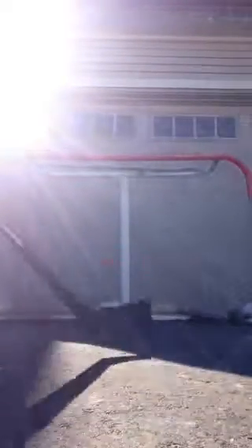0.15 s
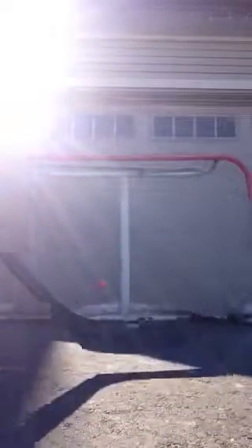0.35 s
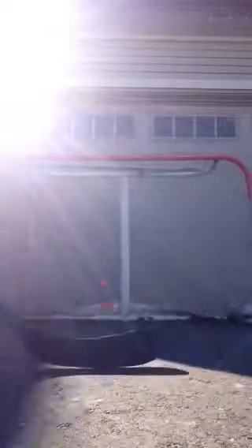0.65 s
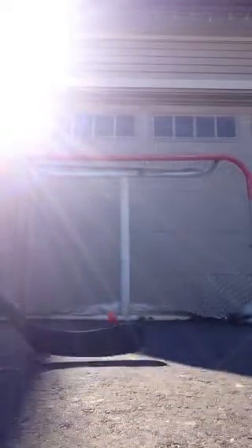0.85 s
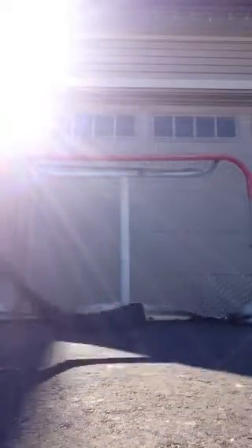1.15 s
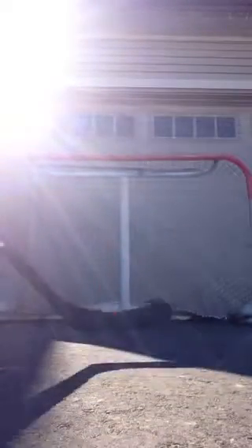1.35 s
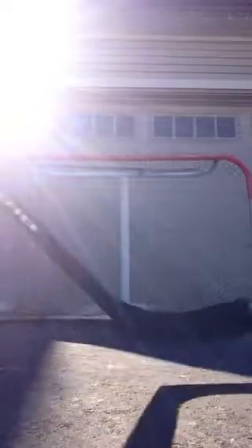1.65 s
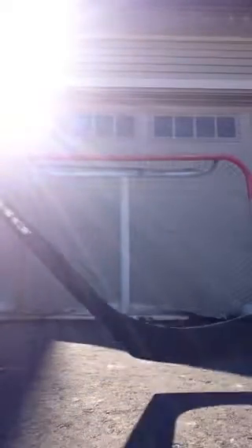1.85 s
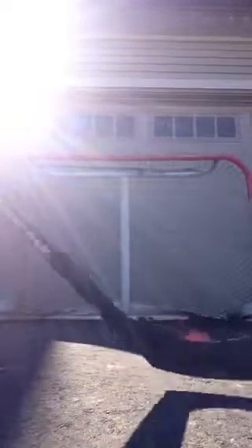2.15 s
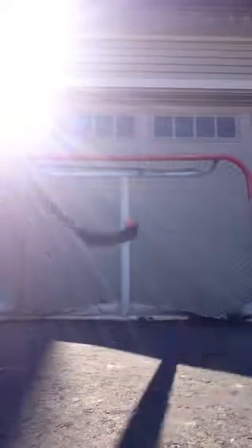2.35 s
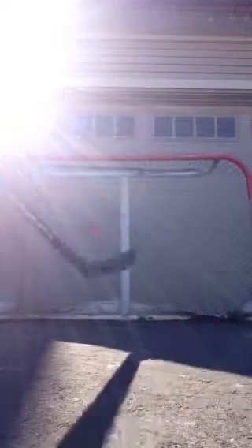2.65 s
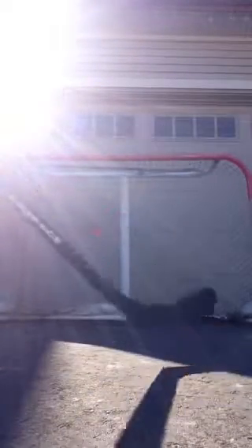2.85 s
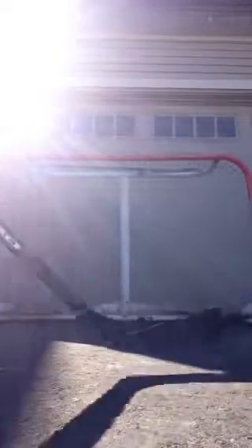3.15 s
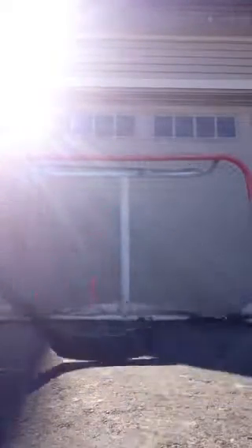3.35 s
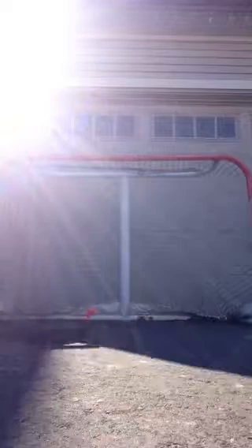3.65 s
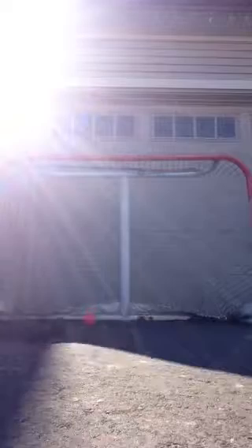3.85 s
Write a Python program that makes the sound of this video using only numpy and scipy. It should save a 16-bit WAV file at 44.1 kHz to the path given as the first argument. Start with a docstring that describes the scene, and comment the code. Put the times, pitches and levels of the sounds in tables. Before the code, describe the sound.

A hockey stick taps and scrapes lightly on gritty pavement, cracks a ball hard into a net, then clatters and drags; close microphone outdoors by a garage, short echoes, early wind puffs, faint traffic.

```python
"""Taps and scrapes of a hockey blade on a paved driveway, one hard shot at a ball, then a clatter and drag.
Place: open paving before a garage front, which returns each knock as short echoes and a scattered tail.
Each knock is a coloured click with a crunch of grit and ringing blade modes; strokes are streams of grains.
Microphone: shaped noise makes wind puffs on it, over a steady far wash of traffic.
The recorder's gain, low at the start, ducks after the shot and creeps back; loud peaks are clipped."""
import sys
import numpy as np
from scipy import signal
from scipy.fft import rfft, irfft
from scipy.io import wavfile
from scipy.ndimage import uniform_filter1d, minimum_filter1d

SR = 44100
rng = np.random.default_rng(int(sys.argv[2]) if len(sys.argv) > 2 else 0)


def generate_wav(signal):
    """Clip the signal to [-1, 1] and save it as 16-bit WAV at the path in sys.argv[1]."""
    frames = np.transpose(np.atleast_2d(signal))
    scaled = np.clip(frames, -1, 1) * 32767
    pcm = np.round(scaled).astype(np.int16)
    wavfile.write(sys.argv[1], SR, pcm)


N = 176400  # 4 s

# Knocks of blade and ball, with some close echoes and grit crunches: start_s, then thud, knock, clack, snap
# and tick level_db, blade_ring_db (before the trim), lower and upper resonance pitch_hz, their height_db, crunch_s
KNOCKS = [ (0.4744, -42.5, -18.5, -23, -31.5, -38.5, -5.5, 1380, 4760, 9.6, 0.00072),
          (0.4855, -55, -36, -41, -32.5, -47, -14, 1930, 3750, 9, 0.0077),
          (0.5654, -28.5, -21, -16, -23, -64, -5, 2070, 3130, 4.9, 0.0061),
          (0.6372, -37, -31.5, -44, -55, -72, 8, 900, 4610, 5.1, 0.0011),
          (0.8255, -31, -31, -35, -30.5, -44.5, -18, 790, 2620, 4.4, 0.01),
          (1.0388, -46, -39, -38, -40, -48.5, -1, 1040, 4560, 3.1, 0.0013),
          (1.4136, -22, -25, -44, -48, -83, -9, 500, 970, 4.5, 0.0037),
          (2.2825, -12, -5, -11.5, -14, -35, -6.5, 647, 1310, 7.4, 0.00089),
          (2.283, -19.5, -13.5, -6, -8.5, -23.5, -7.5, 1430, 5500, 6.3, 0.0049),
          (2.3020, -31, -16, -21, -46, -47, -9, 800, 1346, 5, 0.0012),
          (2.3103, -31, -17.5, -16.5, -33, -35, -9, 900, 1500, 4.4, 0.00072),
          (2.3117, -47, -29, -23, -21, -30.5, -10, 1850, 4400, 8.2, 0.0023),
          (3.1195, -43.5, -19, -23, -22.5, -33, -12, 1450, 4730, 3.9, 0.0023),
          (3.4017, -23.5, -13.5, -17.5, -31.5, -47, 6.5, 1060, 2530, 3.7, 0.00085),
          (3.4077, -52, -19.5, -19.5, -37, -47, -7, 1060, 2550, 4.9, 0.0011),
          (3.4989, -46, -21.5, -20.5, -18.5, -27.5, -12, 2730, 4580, 14, 0.0044),
          (3.5566, -42, -27, -21.5, -18, -24.5, -3, 2260, 5500, 5.4, 0.0056),
          (3.5719, -35, -22.5, -23, -32, -46, -5, 930, 1700, 7.8, 0.0015),
          (3.5722, -42, -32, -37, -17, -36, -12, 3580, 4400, 19, 0.0047),
          (3.7245, -30, -28.5, -35, -54, -51, -10, 794, 1600, 5, 0.00061),
          (3.736, -24, -24, -30, -48, -63, -10, 1050, 1610, 6, 0.0006)]
# Light ticks of grit under blade and ball: start_s, level_db, brightness_db_per_octave, pitch_hz
TICKS = [(0.087, -37.5, 4.5, 3900), (0.777, -36, -5, 1100), (0.8361, -27, 0, 790),
         (1.1589, -35.5, 0.5, 2560), (1.234, -41.5, 3, 4830), (2.6485, -32.5, -1, 3500),
         (2.883, -32, -3, 2120), (3.447, -25.5, 1, 1510), (3.4583, -26, 0.5, 1490), (3.473, -27, -1, 4700),
         (3.511, -31.5, -5.5, 890), (3.523, -35, -3, 4500), (3.5308, -24.5, -1.5, 3850),
         (3.583, -28, 0, 2470), (3.5995, -25.5, -1.5, 1360), (3.607, -29, -3.5, 1290),
         (3.6328, -20.5, 0, 2030), (3.656, -25, -1.5, 1100), (3.692, -22.5, -2, 5500),
         (3.726, -31.5, 5, 5400), (3.7641, -22.5, 1.5, 5450), (3.812, -34.5, 4.5, 5400),
         (3.8542, -26.5, 2.5, 4820)]
# Usual colour of a tick, one level_db for each colour band
TICK_COLOUR_DB = [-18.5, -9, -9, -12, -20.5]
TICK_SPREAD_DB = 2  # no two grains have the same colour
TICK_RING_DB, TICK_CRUNCH_S, TICK_PEAK_DB = -0.5, 0.0026, 8.5
# A tick's upper pitch over its lower: least_ratio, greatest_ratio
TICK_OVERTONE = (1.3, 2.62)
# Air shoved by the shot: start_s, peak_db (before smoothing), decay_s
SHOT_PUSH = (2.2823, -26, 0.0038)


def knocks():
    """Blade and ball knock, with some close echoes and crunches; grit ticks; the shot shoves the air."""
    out = np.zeros(N)
    for start_s, *bands_db, ring_db, low_hz, high_hz, peak_db, crunch_s in KNOCKS:
        add(out, start_s, yard(knock(bands_db, ring_db, (low_hz, high_hz), peak_db, crunch_s)))

    octaves = np.log2(np.array(COLOUR_HZ) / COLOUR_HZ[2])
    for start_s, level_db, tilt, hz in TICKS:
        bands_db = level_db + np.array(TICK_COLOUR_DB) + tilt * octaves
        bands_db = bands_db + TICK_SPREAD_DB * rng.standard_normal(len(octaves))
        pitches_hz = (hz, hz * rng.uniform(*TICK_OVERTONE))
        add(out, start_s, yard(knock(bands_db, TICK_RING_DB, pitches_hz, TICK_PEAK_DB, TICK_CRUNCH_S)))

    start_s, peak_db, decay_s = SHOT_PUSH
    u = np.arange(SR // 15) / SR / decay_s
    push = (1 - u) * np.exp(-u)  # out, then back
    add(out, start_s, amp(peak_db) * signal.lfilter([.1], [1, -.9], push))
    return out


# Centres of the thud, knock, clack, snap and tick bands: centre_hz
COLOUR_HZ = [280, 900, 2100, 4200, 9000]
PEAK_WIDTH_HZ, PEAK_WIDTH_SHARE = 216, 0.069  # the resonances widen with pitch
KNOCK_SPAN_S = 0.008  # span over which a knock's level holds; also the reference crunch


def knock(bands_db, ring_db, pitches_hz, peak_db, crunch_s):
    """One knock or tick: band levels set its colour, its place two short, broad resonances."""
    band_widths_hz = np.array([400, 1000, 1500, 3000, 6000])
    db = np.array(bands_db) - 10 * np.log10(band_widths_hz)
    below = [(40, db[0] - 29), (130, db[0] - 13.0)]
    above = [(12500, db[-1] - 12.5), (16000, db[-1] - 14)]
    peaks = [(hz, peak_db, PEAK_WIDTH_HZ + PEAK_WIDTH_SHARE * hz) for hz in pitches_hz]
    pulse = click([*below, *zip(COLOUR_HZ, db), *above], peaks)
    struck = signal.fftconvolve(crunch(crunch_s), pulse)
    energy = KNOCK_SPAN_S * SR * np.sum(amp(bands_db) ** 2)
    return unit(blade(struck, ring_db, pitches_hz)) * np.sqrt(energy)


CRUNCH_DB = 17.5  # grit against the first tick, for a crunch of 8 ms


def crunch(crunch_s):
    """A first tick and a swell of crushed grit, spread evenly over all frequencies."""
    u = np.minimum(np.arange(SR // 80) / SR / max(crunch_s, 1 / SR), 1)
    swell = unit(rng.standard_normal(len(u)) * u * (1 - u))
    force = swell * amp(CRUNCH_DB) * crunch_s / KNOCK_SPAN_S
    force[0] = 1
    spectrum = rfft(force, 2048)
    smooth_power = uniform_filter1d(abs(spectrum) ** 2, size=25)
    return irfft(spectrum / np.sqrt(smooth_power))[:len(u)]


# Modes of the blade: pitch_hz, level_db (relative), t60_s
BLADE = [(567, -7, 0.056), (1093, -7, 0.036), (1659, -5.5, 0.043), (2196, -1, 0.041), (2540, 1.5, 0.078),
         (3556, 6.5, 0.037), (4330, 3.5, 0.048), (4660, 12.5, 0.016), (5654, 11, 0.013),
         (12850, 10.5, 0.031)]
MODE_SPREAD_DB, MODE_DETUNE = 0.5, 0.011  # each ring differs a little; detune is a share
FOCUS_DB_PER_OCTAVE = 4  # the point of contact favours some modes
RING_TRIM_DB = -7.0  # added to every blade ring level


def blade(x, ring_db, favoured_hz):
    """The direct sound plus the ringing of the blade, strongest near the favoured pitches."""
    t = np.arange(SR // 8) / SR
    ring = np.zeros(len(t))
    for hz, level_db, t60_s in BLADE:
        louder, sharper = rng.uniform(-1, 1, 2)
        octaves_away = min(np.min(abs(np.log2(hz / np.array(favoured_hz)))), 1)
        size = amp(level_db + MODE_SPREAD_DB * louder - FOCUS_DB_PER_OCTAVE * octaves_away)
        decay = np.exp(-np.log(1000) * t / t60_s)
        ring += size * decay * np.cos(2 * np.pi * hz * (1 + MODE_DETUNE * sharper) * t)
    ring = unit(ring) * amp(ring_db + RING_TRIM_DB)
    ring[0] += 1
    return signal.fftconvolve(x, ring)


# Strokes of the blade edge, singing: start_s, length_s, level_db (before the edge cut)
SLIDES = [(.64, 0.07, -39), (.70, 0.069, -35), (.778, 0.017, -28), (3.41, 0.06, -41), (3.565, 0.091, -38)]
# Flat drags of blade and ball, dull: start_s, length_s, level_db, brightness_db_per_octave
SCUFFS = [(1.422, 0.0204, -42, 0.79), (1.63, 0.082, -30.5, 1.56), (3.653, 0.066, -31, 0),
          (3.734, 0.1767, -29, 0.3), (3.911, 0.11, -32.5, 0.73)]
# Loose grit: start_s, length_s, level_db
BRUSHES = [(.09, 0.06, -43), (.28, 0.041, -44.5), (.84, 0.26, -53.5), (1.6, 0.14, -56), (2.05, 0.157, -50),
           (2.66, 0.12, -47), (3.58, 0.42, -57)]
# Coarse grit under the dragged blade: start_s, length_s, level_db
GRAVEL = [(3.42, 0.048, -40), (3.58, .06, -38.5), (3.66, 0.267, -44)]
# The ball sinks into the net: start_s, length_s, level_db
NET_RUSTLE = [(2.315, 0.029, -31), (2.345, 0.1, -47.5)]
# Spectra of edge, flat drag and loose grit: frequency_hz, level_db_per_hz (relative)
SLIDE_SPECTRUM = [(100, -17), (500, 5.5), (1500, 4.5), (3200, -3), (4400, -1.5), (5800, -17), (7000, -29),
                  (15000, -55)]
SCUFF_SPECTRUM = [(60, -45), (150, -5.5), (280, 8), (600, 1), (1700, -8.5), (3000, -23.5), (5000, -24.5),
                  (15000, -59.5)]
BRUSH_SPECTRUM = [(200, -12), (1500, 10.5), (4500, 6.5), (6500, 0), (10000, -10.5), (15000, -26)]
SLIDE_RING_DB, USUAL_RING_HZ, EDGE_CUT_DB = -6, 3600, -5.5  # ring level is before the trim


def scrapes():
    """The edge rings in the blade's modes; flat drags are dull; loose grit and the net hiss."""
    edge = friction(SLIDES, grains_per_s=2500, spread_db=2.5)
    edge = blade(edge, SLIDE_RING_DB, [USUAL_RING_HZ])[:N]
    out = colour(edge, SLIDE_SPECTRUM) * amp(EDGE_CUT_DB)

    for *stroke, tilt in SCUFFS:
        spectrum = [(hz, db + tilt * np.log2(hz)) for hz, db in SCUFF_SPECTRUM]
        out += colour(friction([stroke], grains_per_s=5000, spread_db=0.5), spectrum)

    net = friction(NET_RUSTLE, grains_per_s=650, spread_db=1.0)
    gravel = friction(GRAVEL, grains_per_s=260, spread_db=2.0)
    loose_grit = friction(BRUSHES, grains_per_s=1500, spread_db=1.5)
    return out + colour(net + gravel + loose_grit, BRUSH_SPECTRUM)


# Resonances of the dragged edge: pitch_hz, pole_width_hz, level_db (against the slips)
SQUEAL = [(4390, 710, -9.5), (5540, 330, -15.5)]
SQUEAL_WANDER, WANDER_S = 0.01, 0.02  # pitch wander: share, step
CHATTER_DB, CHATTER_S = 3.5, 0.006  # level chatter: spread, step


def squeal():
    """The dragged edge chatters and sings at pitches that wander with the point of contact."""
    slips = friction(SLIDES, grains_per_s=2500, spread_db=2.0) * amp(CHATTER_DB * drift(CHATTER_S))
    bend = 1 + SQUEAL_WANDER * drift(WANDER_S)
    out = np.zeros(N)
    for hz, width_hz, level_db in SQUEAL:
        turn = np.exp(2j * np.pi * np.cumsum(hz * bend) / SR)
        r = np.exp(-np.pi * width_hz / SR)
        # Shift the moving pitch to zero, resonate there, shift back
        ring = turn * signal.lfilter([1], [1, -2 * r, r * r], slips / turn + 1e-18)
        out += amp(level_db) * unit(ring.real) * np.linalg.norm(slips)
    return out


STROKE_RISE_S, STROKE_FALL_S = 0.01, 0.0078


def friction(strokes, grains_per_s, spread_db):
    """Grains of uneven size, caught while a stroke lasts."""
    t = np.arange(N) / SR
    hits = rng.random(N) < grains_per_s / SR
    sizes = amp(spread_db * np.minimum(rng.exponential(1, N), 4))
    grains = hits * rng.choice([-1, 1], N) * sizes
    press = np.zeros(N)
    for start_s, length_s, level_db in strokes:
        rise = np.clip((t - start_s) / STROKE_RISE_S + .5, 0, 1)
        fall = np.clip((start_s + length_s - t) / STROKE_FALL_S + .5, 0, 1)
        press += amp(level_db) * rise * fall
    return unit(grains) * np.sqrt(N) * press


def drift(step_s):
    """Slow chance: a new value every step, joined by lines."""
    values = rng.standard_normal(N // 40)
    return np.interp(np.arange(N) / SR / step_s, np.arange(len(values)), values)


# Echoes off ground and walls: delay_s, level_db (at low frequencies)
ECHOES = [(.0063, -17.5), (0.0156, -29.5), (0.0211, -19.5), (.0288, -28)]
YARD_DB, YARD_T60_S, YARD_RISE_S = -5, 0.15, 0.0023  # scattered tail: energy against the direct sound


def yard(x):
    """The direct sound, a few distinct, duller echoes and a short scattered tail."""
    t = np.arange(SR // 3) / SR
    swell = 1 - np.exp(-(t / YARD_RISE_S) ** 2)
    scatter = rng.standard_normal(len(t)) * swell * np.exp(-np.log(1000) * t / YARD_T60_S)
    spectrum = [(100, -11.0), (400, -11.5), (1200, -4.5), (4000, -4.5), (12000, 4)]
    response = amp(YARD_DB) * unit(colour(scatter, spectrum))
    response[0] += 1
    dull_click = signal.lfilter([.5], [1, -.5], signal.unit_impulse(SR // 1000))
    for delay_s, level_db in ECHOES:
        add(response, delay_s, amp(level_db) * dull_click)
    return signal.fftconvolve(x, response)[:N]


# Wind puffs on the microphone: centre_s, level_db (at the centre, before the high-pass), half_width_s
PUFFS = [(.005, -26.5, 0.0051), (0.128, -33.5, 0.031), (.295, -26, 0.017), (0.341, -28, 0.0079),
         (0.357, -16.5, 0.0078), (0.391, -26, 0.015), (0.524, -28.5, 0.014), (1.13, -43, 0.032)]
# Spectrum of the air before its swells are evened: frequency_hz, level_db_per_hz (relative)
PUFF_SPECTRUM = [(30, -37), (70, 2), (115, -15.5), (215, 1.5), (320, -12), (500, -12), (800, -29),
                 (3000, -82)]


def wind():
    """Short low puffs on the microphone: shaped noise under bell-shaped swells."""
    t = np.arange(N) / SR
    air = signal.hilbert(colour(rng.standard_normal(N), PUFF_SPECTRUM))
    evened = air.real / abs(air) ** .5
    air = colour(evened, [(40, -30), (110, 10), (600, -3.5), (2000, -37)])
    swells = sum(amp(db) * np.exp(-((t - s) / width_s) ** 2) for s, db, width_s in PUFFS)
    puffs = unit(air) * np.sqrt(N) * swells
    return signal.sosfilt(signal.butter(2, 100, "highpass", fs=SR, output="sos"), puffs)


# Spectrum of the far traffic: frequency_hz, level_db_per_hz (relative)
TRAFFIC_SPECTRUM = [(18, -71), (30, -37), (81, -24.5), (111, -8), (144, -1.5), (213, -1.5), (359, -4),
                    (399, -9), (575, -5), (1170, -11), (1470, -9), (1820, -13.5), (4660, -19), (6210, -30),
                    (15500, -50.5)]
# Resonances in it: pitch_hz, height_db, width_hz
TRAFFIC_PEAKS = [(573, 4.5, 33), (2430, 4, 150)]
TRAFFIC_DB = -42


def traffic():
    """A steady far wash of filtered noise."""
    noise = rng.standard_normal(N + SR)
    return amp(TRAFFIC_DB) * colour(noise, TRAFFIC_SPECTRUM, TRAFFIC_PEAKS)[SR:]


def amp(db):
    """Decibels to amplitude."""
    return 10 ** (np.asarray(db) / 20)


def unit(x):
    """Scales to an energy of 1."""
    return x / np.sqrt(np.sum(x ** 2) + 1e-20)


def add(mix, start_s, sound):
    """Lays a sound into the mix, cut off at its end."""
    part = mix[max(round(start_s * SR), 0):][:len(sound)]
    part += sound[:len(part)]


def click(points, peaks=(), size=4096):
    """A causal click with the spectrum (Hz, dB), resonances (Hz, dB, width Hz) and energy 1."""
    hz, db = np.transpose(points)
    f = abs(np.fft.fftfreq(size, 1 / SR))
    db = np.interp(np.log(f + 1), np.log(hz), db)
    for centre, lift, width in peaks:
        db = db + lift / (1 + (2 * (f - centre) / width) ** 2)
    minimum_phase = np.exp(np.conj(signal.hilbert(np.log(amp(db)))))
    return unit(np.fft.ifft(minimum_phase).real[:size // 2])


def colour(x, points, peaks=()):
    """Filters by a spectrum and its resonances."""
    return signal.fftconvolve(x, click(points, peaks))[:len(x)]


def scene():
    """Blade and ball in the yard, wind on the microphone, traffic beyond."""
    return (knocks() + yard(scrapes() + squeal()) + wind() + traffic())[None]


LIMIT_DB, HOLD_S, RECOVER_S, START_DUCK_DB = -1, 0.11, 0.92, 8.5  # gain control
CEILING, EDGE_HZ = 0.69, 15450  # overload amplitude; upper band limit


def record(dry, attack_s=0.00069):
    """Gain control, still recovering at the start, drops on peaks, holds and creeps back; overload; band limit."""
    over_db = np.maximum(20 * np.log10(abs(dry[0]) + 1e-9) - LIMIT_DB, 0)
    size = 2 * int(HOLD_S * SR / 2) + 1
    held_db = -minimum_filter1d(-over_db, size, origin=size // 2, mode="constant")  # looks back only
    fade = np.exp(-np.arange(N) / SR / RECOVER_S)
    duck_db = np.maximum.accumulate(np.maximum(held_db / fade, START_DUCK_DB)) * fade
    r = np.exp(-1 / (attack_s * SR))
    duck_db = signal.lfilter([1 - r], [1, -r], duck_db - START_DUCK_DB) + START_DUCK_DB
    loud = np.clip(dry * amp(-duck_db), -CEILING, CEILING)
    band_limit = signal.firwin(255, EDGE_HZ, window=("kaiser", 8), fs=SR)
    return signal.oaconvolve(loud, band_limit[None], "same")


dry = scene()
out = record(dry)
generate_wav(out)
```